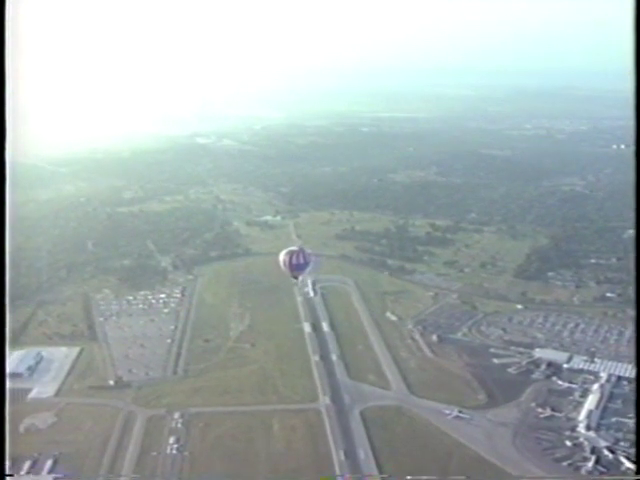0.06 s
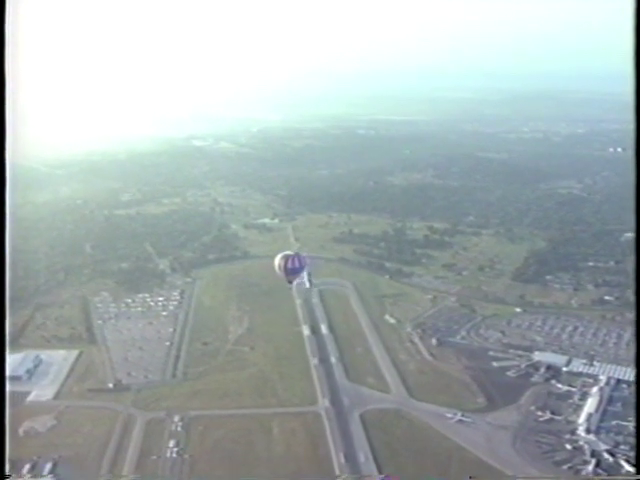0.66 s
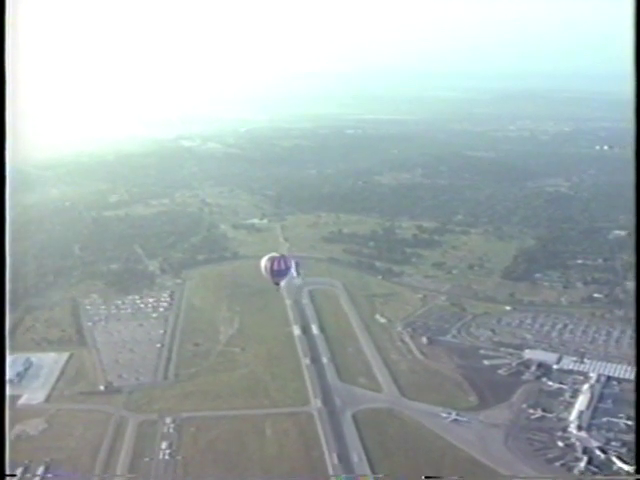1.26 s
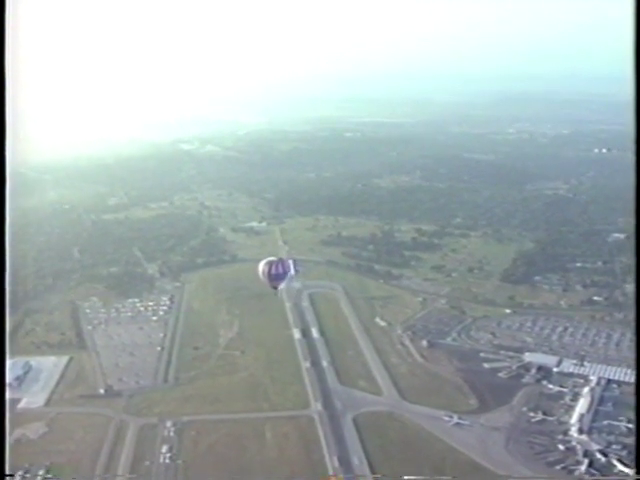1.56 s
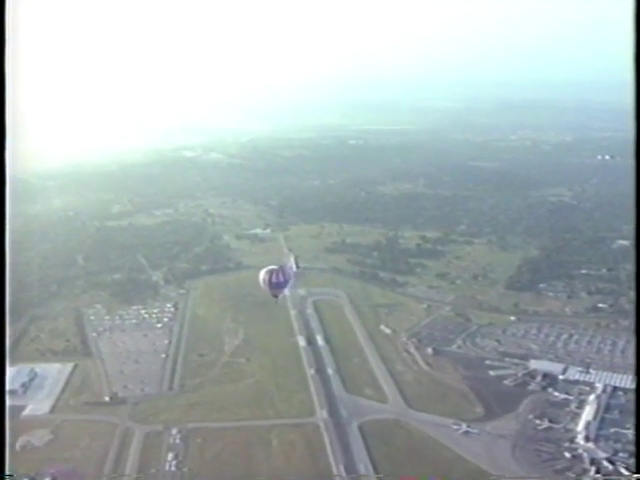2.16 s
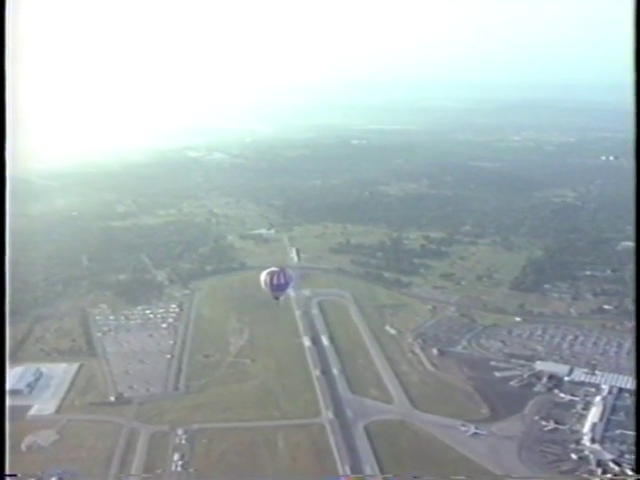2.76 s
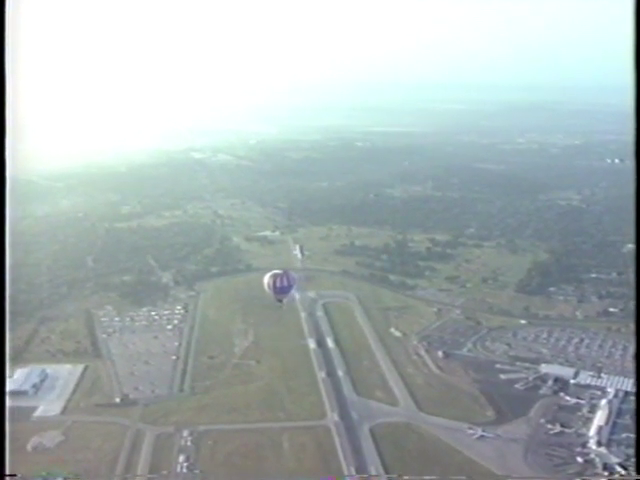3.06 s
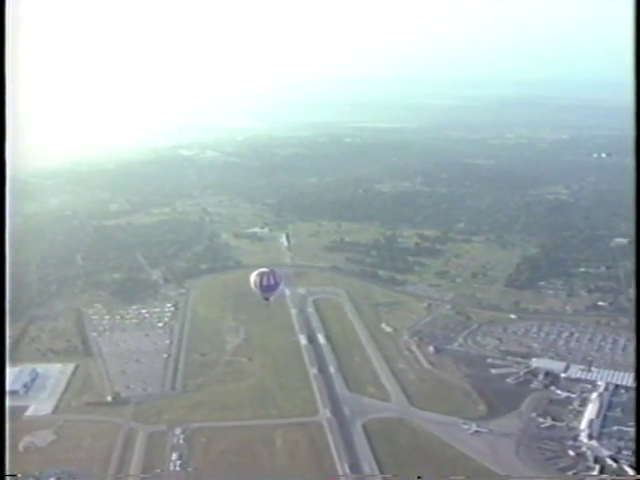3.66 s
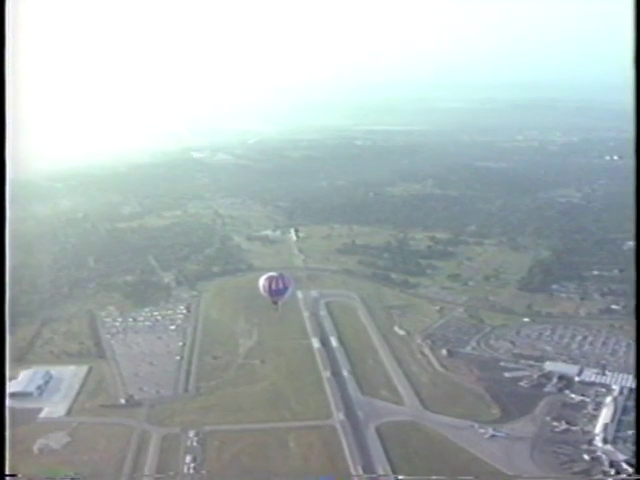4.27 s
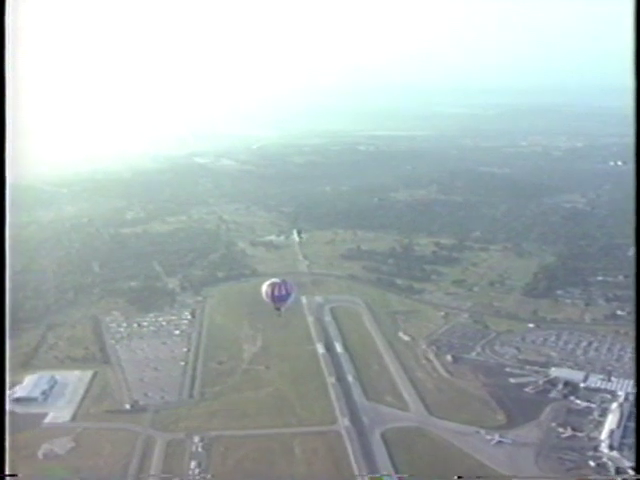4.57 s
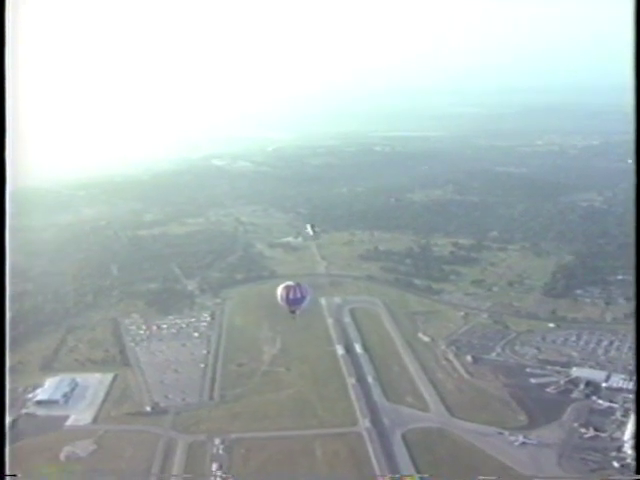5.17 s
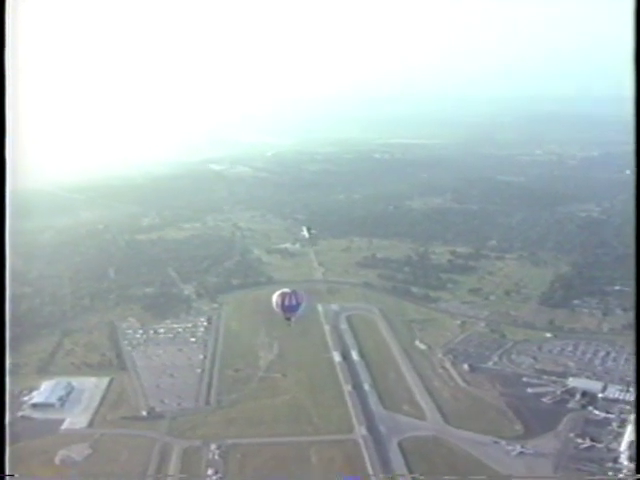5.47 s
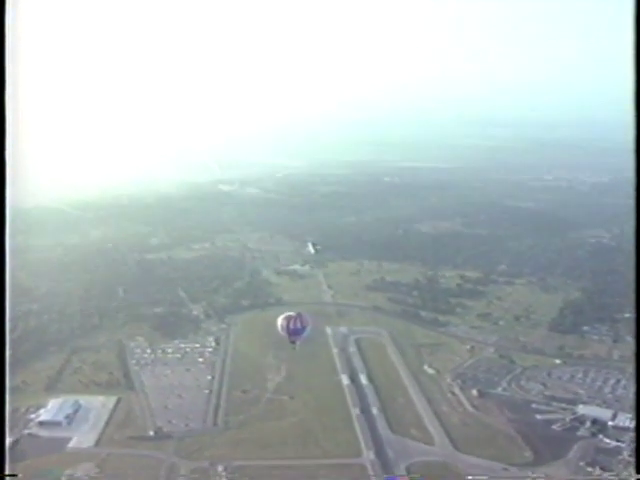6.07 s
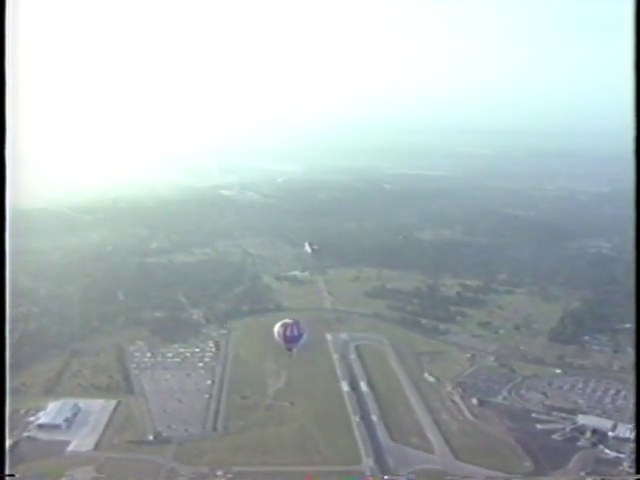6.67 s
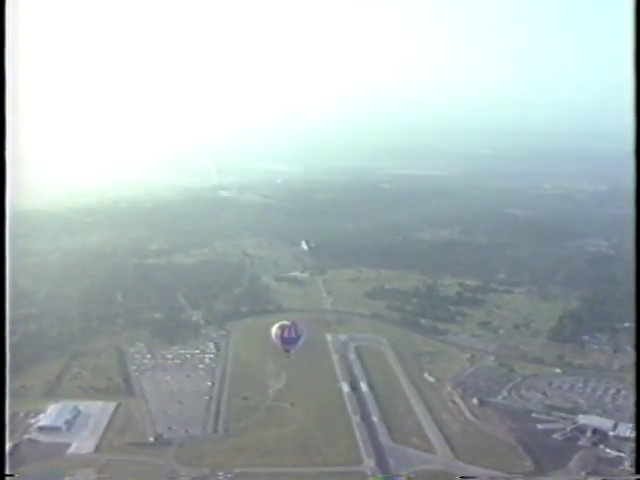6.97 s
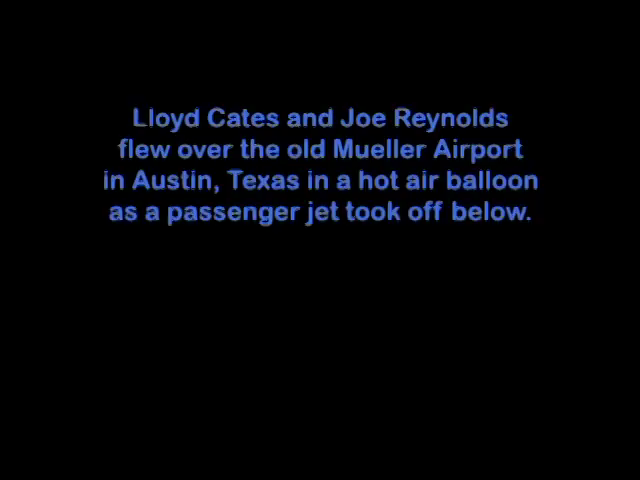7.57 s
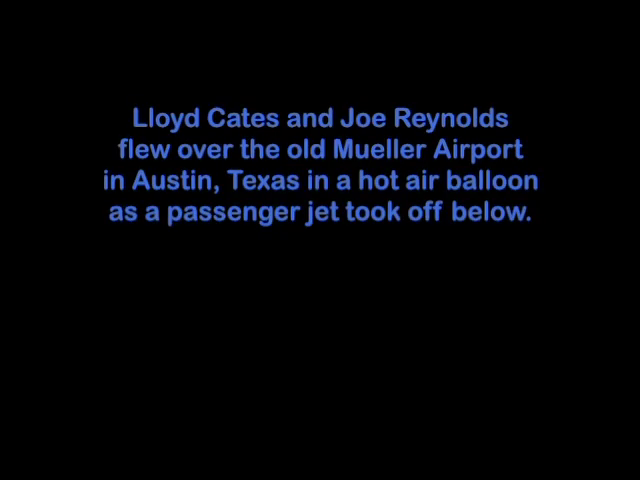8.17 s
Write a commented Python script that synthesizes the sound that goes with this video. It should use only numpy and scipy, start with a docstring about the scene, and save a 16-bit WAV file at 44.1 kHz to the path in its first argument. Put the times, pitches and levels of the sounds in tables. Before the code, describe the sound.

From the start, a steady, fairly quiet rush of wind and a low rumble of distant aircraft engines fill the open air, leaning slightly to the right. A hollow engine note fades and returns within the drone. Very faint, bright ticks and light rustles come from the balloon basket, once or twice near the beginning and more often between 3 and 5 seconds. At about 5.3 seconds a gas burner opens close by and catches at once with a thump. It burns with a loud, low roar and a bright, wide hiss of gas, pushing the background down. The flame flutters and tears raggedly, with small spurts, the clearest at about 7.2 seconds. The roar holds a nearly even level until about 7.7 seconds, when everything cuts off abruptly, leaving silence to the end.

```python
"""A hot air balloon's burner roars and hisses above the basket. Its blast valve opens, a turbulent jet
of propane excites the resonances of the burner can, and the gas catches with a thump and burns on.
Behind it lie a steady rush of wind and far engines, and faint rustles and ticks in the basket.
A camera's gain control and fast limiter hold the roar down, until the sound is switched off abruptly."""
import sys
import numpy as np
from scipy import signal
from scipy.fft import rfft, irfft, next_fast_len
from scipy.io import wavfile
from scipy.ndimage import uniform_filter1d, map_coordinates

SR = 44100
rng = np.random.default_rng(int(sys.argv[2]) if len(sys.argv) > 2 else 0)


def dump(signal):
    """Clip the signal to [-1, 1] and save it as 16-bit WAV at the path in sys.argv[1]."""
    limited = np.clip(np.atleast_2d(signal).T, -1, 1)
    pcm = np.round(limited * 32767).astype(np.int16)
    wavfile.write(sys.argv[1], SR, pcm)


N = 371763
T = np.arange(N) / SR
VALVE_S, IGNITE_S, FULL_S = 5.318, 5.349, 5.42  # the gas starts, catches, reaches full flow


def amp(db):
    """Decibels to amplitude ratio."""
    return 10 ** (np.asarray(db) / 20)

def unit(x):
    """Normalisation to rms 1."""
    return x / np.sqrt(np.mean(x ** 2) + 1e-20)

def along(points, hz):
    """Interpolation on a logarithmic frequency axis."""
    freqs, values = np.transpose(points)
    return np.interp(np.log(hz + 1), np.log(freqs + 1), values)

def envelope(points):
    """Linear interpolation in time."""
    return np.interp(T, *np.transpose(points))

def ramp(start, length):
    """A linear rise from 0 to 1 over length seconds."""
    return np.clip((T - start) / length, 0, 1)

def swell(middle, length):
    """A Gaussian pulse of height 1; length is its width at half height."""
    return 2 ** (-(2 * (T - middle) / length) ** 2)

def wobble(rate):
    """Smooth random modulation, rate knots a second."""
    return map_coordinates(rng.standard_normal(int(N * rate / SR) + 4), [T * rate])

def filtered(x, response):
    """Linear filtering: the spectrum is multiplied by a frequency response."""
    size = next_fast_len(N + SR // 2)
    return irfft(rfft(x, size) * response(np.fft.rfftfreq(size, 1 / SR)), size)[..., :N]

def sides(lean_db):
    """Channel gains for a level difference, left minus right."""
    return amp(np.array([[.5], [-.5]]) * lean_db)

def noise(spectrum, coherence):
    """Coloured stereo noise of rms 1; the ratio of mid to side sets its coherence."""
    angle = lambda hz: np.arccos(along(coherence, hz)) / 2
    colour = lambda hz: amp(along(spectrum, hz)) * [np.cos(angle(hz)), np.sin(angle(hz))]
    mid, side = filtered(rng.standard_normal((2, N)), colour)
    return unit(np.array([mid + side, mid - side]))


# Spectra of the drone's four bands. Each row: frequency in Hz, relative density in dB.
RUMBLE_SPECTRUM = [(15, -23.5), (30, -14.5), (50, -5.5), (85, 0.5), (102, -2.5), (130, 1), (165, -3),
                   (215, -10.5), (400, -16), (900, -71)]
RUSH_SPECTRUM = [(100, -23.5), (200, -8), (290, -3.5), (480, -5.5), (730, -2), (1000, -3), (1290, -7),
                 (1550, -8), (2000, -13.5), (2600, -22), (4000, -36.5), (9000, -80)]
ENGINE_SPECTRUM = [(450, -40), (700, -11.5), (830, -2.5), (935, 3.3), (1000, 1), (1110, -4), (1280, -15.5),
                   (1700, -54)]
AIR_SPECTRUM = [(1000, -24.5), (2200, 1), (3000, 3.5), (4200, -0.5), (5800, -2.8), (6700, -9),
                (8000, -17.6), (11000, -27.5), (15500, -41)]
# Slow drifts of wind, engine note and air hiss. Each row: time in seconds, relative level in dB.
WIND_LEVELS = [(0, -.7), (1.3, .5), (1.9, .8), (3.1, .4), (3.6, -0.3), (4.3, 0), (5.3, -0.84)]
ENGINE_LEVELS = [(0, -33), (1.0, -32), (1.6, -31.5), (2.3, -39), (3.0, -33), (3.75, -35.5), (4.0, -30.5),
                 (4.7, -30), (5.1, -32.5)]
AIR_LEVELS = [(0, -48.5), (1.3, -46.5), (2.4, -45.5), (5.3, -45.5)]
# Stereo width of the background. Each row: frequency in Hz, left-right coherence.
BACKGROUND_COHERENCE = [(60, .96), (300, .965), (800, .987), (1400, .98), (3100, .94), (6800, .94),
                        (10000, .2)]
# The drone's lean to the right. Each row: frequency in Hz, left minus right level in dB.
DRONE_BALANCE = [(60, -3.5), (110, -3.0), (200, -2.5), (380, -4.5), (700, -2.5), (1290, -4), (2380, -3.0),
                 (4400, 0), (8120, -0.5), (15000, -0.5)]

def drone(rumble_db=-32.0, rush_db=-26.5):
    """Wind and far engines add as incoherent noise; the hollow note fades and returns on the wind."""
    wind_db, engine_db = envelope(WIND_LEVELS), envelope(ENGINE_LEVELS)
    rumble = amp(rumble_db + wind_db + 1.1 * wobble(7)) * noise(RUMBLE_SPECTRUM, BACKGROUND_COHERENCE)
    rush = amp(rush_db + wind_db + 0.27 * wobble(9)) * noise(RUSH_SPECTRUM, BACKGROUND_COHERENCE)
    hollow = amp(engine_db + 0.73 * wobble(8)) * noise(ENGINE_SPECTRUM, BACKGROUND_COHERENCE)
    air = amp(envelope(AIR_LEVELS)) * noise(AIR_SPECTRUM, BACKGROUND_COHERENCE)
    return filtered(rumble + rush + hollow + air, lambda hz: sides(along(DRONE_BALANCE, hz)))


# Spectrum of rubs and ticks. Each row: frequency in Hz, relative density in dB.
BASKET_SPECTRUM = [(1000, -36), (4000, 5), (7000, 7), (10000, -5.5), (12000, -19), (15000, -36)]
# Light rubs. Each row: middle in seconds, length in seconds, level at the middle in dB.
BASKET_RUBS = [(.38, .3, -65), (3.32, .2, -61), (4.0, .15, -64), (4.3, .2, -61), (4.9, .25, -65)]

def rustle(grain_db=3.0):
    """Friction: something light rubs in the basket, giving noise in fine uneven grains."""
    rubbing = sum(amp(db) * swell(s, length) for s, length, db in BASKET_RUBS)
    grains = amp(grain_db * wobble(250))
    return rubbing * unit(grains * noise(BASKET_SPECTRUM, BACKGROUND_COHERENCE))


# Faint ticks in the basket. Each row: start in seconds, relative level in dB.
BASKET_TICKS = [(0.3371, -43), (1.1338, -50), (3.2614, -47), (3.494, -38.5), (3.9245, -46), (3.9943, -47),
                (4.0216, -39.5), (4.2108, -45), (4.3555, -45), (4.3889, -44), (4.8698, -42.5)]

def ticks(t60_s=0.024, level_db=-3):
    """Damped transients: each tick is bright noise with a sudden onset and exponential decay."""
    decays = sum(amp(db + level_db - 60 * np.abs(T - s) / t60_s) * (T >= s) for s, db in BASKET_TICKS)
    return decays * noise(BASKET_SPECTRUM, BACKGROUND_COHERENCE)


def pressure_sag(db_per_s):
    """Flow noise weakens as the feed pressure falls: the loss in dB since full flow."""
    return db_per_s * np.maximum(T - FULL_S, 0)


# Spurts of fuel. Each row: middle in seconds, length in seconds, jet lift in dB, tearing lift in dB.
FUEL_SPURTS = [(5.659, .05, 2.5, 1.5), (5.81, .06, 3, 1.5), (5.85, .04, 1, 4), (6.3, 0.082, 2.6, 2),
               (6.68, 0.086, 2, 1), (7.05, 0.072, 1.5, 2), (7.181, .055, 3.3, 6), (7.245, .045, 1, 6.3),
               (7.59, 0.039, -1, 3)]

def fuel_spurts():
    """Unsteady flow modulates amplitude: the lifts in dB as the jet spits and the flame tears."""
    jet_db = sum(db * swell(s, length) for s, length, db, _ in FUEL_SPURTS)
    tearing_db = sum(db * swell(s, length) for s, length, _, db in FUEL_SPURTS)
    return jet_db, tearing_db


# Modes of the burner can and coil. Each row: frequency in Hz, width in Hz, lift in dB.
CAN_MODES = [(2400, 300, 1.5), (3250, 340, 5.7), (3900, 320, 5.7), (5100, 400, 3), (6450, 300, 1.5),
             (7400, 400, 2), (7950, 300, 1.5)]

def can_ringing(hiss):
    """Forced resonance: the can rings near its modes, from one spot and so alike in both channels."""
    def response(hz):
        lift_db = sum(db * np.exp(-(2 * (hz - centre) / width) ** 2) for centre, width, db in CAN_MODES)
        return amp(lift_db) - 1
    return filtered(hiss.mean(axis=0), response)


# Spectrum of the gas jet. Each row: frequency in Hz, relative density in dB.
JET_SPECTRUM = [(500, -20), (1200, -5.5), (2000, 7.5), (2900, 1.5), (4400, 0), (6000, 1), (7600, 1.5),
                (8600, 0.5), (10000, 1.5), (12000, -7), (15500, -18.5)]
# Stereo width of the jet. Each row: frequency in Hz, left-right coherence.
JET_COHERENCE = [(1300, .9), (2000, .65), (2500, .6), (2900, .35), (4400, .25), (6000, .45), (7000, .4),
                 (8000, .1), (9500, .6), (10700, .62), (13000, .33)]
# Phase difference of the jet. Each row: frequency in Hz, lead of the left channel in radians.
JET_PHASE = [(1400, -.4), (1900, -1.1), (2700, -.9), (3400, -.55), (4300, 0), (5000, .5), (7200, .4),
             (8000, 1.1), (8400, 2.9), (15000, 2.7)]

def gas_jet(flicker, spurt_db, level_db=-22.5, flicker_db=.5, sputter_db=1.23):
    """Turbulent jet noise: propane hisses from the nozzles, rings the can and sputters as it boils."""
    hiss = noise(JET_SPECTRUM, JET_COHERENCE)
    hiss = hiss + can_ringing(hiss)
    phase_shift = lambda hz: np.exp(np.array([[.5j], [-.5j]]) * along(JET_PHASE, hz))
    hiss = unit(filtered(hiss, phase_shift))
    flow = ramp(VALVE_S, FULL_S - VALVE_S) ** 1.2
    surge_db = 2.5 * swell(FULL_S + .015, length=.095)  # overshoot as the valve opens
    jet_db = level_db + surge_db - pressure_sag(db_per_s=1.75) + spurt_db
    flutter_db = flicker_db * flicker + sputter_db * wobble(160)
    return sides(-2.4) * flow * amp(jet_db + flutter_db) * hiss


# Spectra of the flame's low roar and its tearing. Each row: frequency in Hz, relative density in dB.
ROAR_SPECTRUM = [(20, -28), (50, -17.5), (100, -10.5), (160, -1), (230, -0.9), (295, 2), (345, -3),
                 (420, .5), (540, -2.5), (730, -10.5), (1050, -26), (1600, -31.5), (2500, -48), (5000, -74)]
TEARING_SPECTRUM = [(400, -30), (750, 0.5), (1050, 1), (1350, -6), (1600, -8), (1900, -16.5), (2600, -20),
                    (4500, -41)]
# Stereo width of the flame. Each row: frequency in Hz, left-right coherence.
FLAME_COHERENCE = [(50, .92), (150, 1), (450, 0.98), (1000, 1)]

def flame(flicker, spurt_db, roar_db=-2.5, tearing_db=-15.5, flicker_db=1.14, ragged_db=1.9):
    """Combustion noise: turbulent burning roars low and tears raggedly above."""
    age_s = np.abs(T - IGNITE_S)
    flare_db = 7 * np.exp(-age_s / 0.0074)  # the gathered gas goes up with a thump
    young_db = 6.5 * np.exp(-age_s / 0.11)  # the young flame is weaker, then fills out
    loss_db = pressure_sag(db_per_s=1.25) + young_db + 0.23 * spurt_db  # spurts trade roar for tearing
    roar = amp(roar_db + flare_db - loss_db) * noise(ROAR_SPECTRUM, FLAME_COHERENCE)
    change_db = spurt_db - pressure_sag(db_per_s=2.7) + ragged_db * wobble(90)
    tearing = amp(tearing_db + change_db) * noise(TEARING_SPECTRUM, FLAME_COHERENCE)
    tearing *= ramp(IGNITE_S, FULL_S - IGNITE_S)  # the flame tears only once the gas is fast
    burning = ramp(IGNITE_S, .002) * amp(flicker_db * flicker)
    return burning * (sides(-0.82) * roar + sides(.1) * tearing)


def scene():
    """Superposition: flame and jet flicker together with the gas flow, over the background."""
    flicker = wobble(35)
    jet_spurt_db, tearing_spurt_db = fuel_spurts()
    background = drone() + rustle() + ticks()
    return background + flame(flicker, tearing_spurt_db) + gas_jet(flicker, jet_spurt_db)

def gain_control(x, threshold_db=-15, slope=0.68, follow_s=0.2):
    """Compression: gain falls as mean power passes a threshold, so the drone ducks under the roar."""
    step = 1 / (follow_s * SR)
    power = signal.lfilter([step], [1, step - 1], np.mean(x ** 2, axis=0))
    excess_db = np.maximum(10 * np.log10(power + 1e-12) - threshold_db, 0)
    return x * amp(-slope * excess_db)

def limiter(x, ceiling_db=-5.0, knee=5, release_db_per_s=260, attack_s=0.00073):
    """Peak limiting: each peak pulls both channels down; gain recovers in a few cycles of the roar."""
    peak_ratio = np.abs(x).max(axis=0) / amp(ceiling_db)
    cut_db = 20 * np.log10(1 + peak_ratio ** knee) / knee
    held_db = np.maximum.accumulate(cut_db + release_db_per_s * T) - release_db_per_s * T
    return x * amp(-uniform_filter1d(held_db, int(attack_s * SR)))

def record(dry, off_s=7.651, top_hz=15760):
    """Dynamic range and bandwidth are limited, and the sound is switched off abruptly."""
    switched_on = 1 - ramp(off_s, .002)
    low_pass = lambda hz: np.clip((top_hz - hz) / 60 + .5, 0, 1)
    return filtered(limiter(gain_control(dry)) * switched_on, low_pass)


dry = scene()
out = record(dry)
dump(out)
```